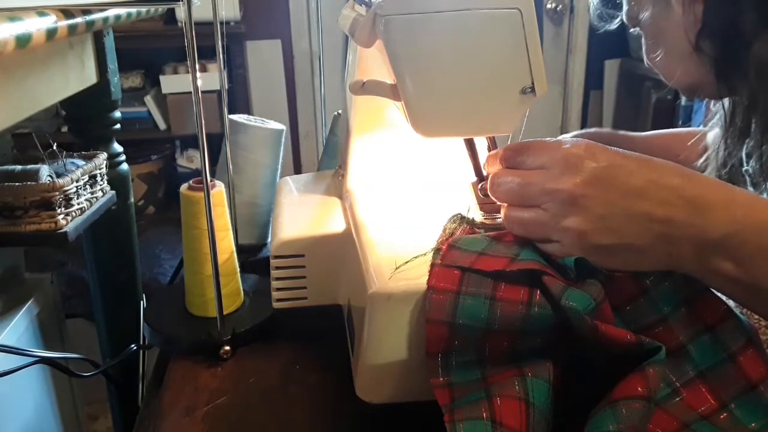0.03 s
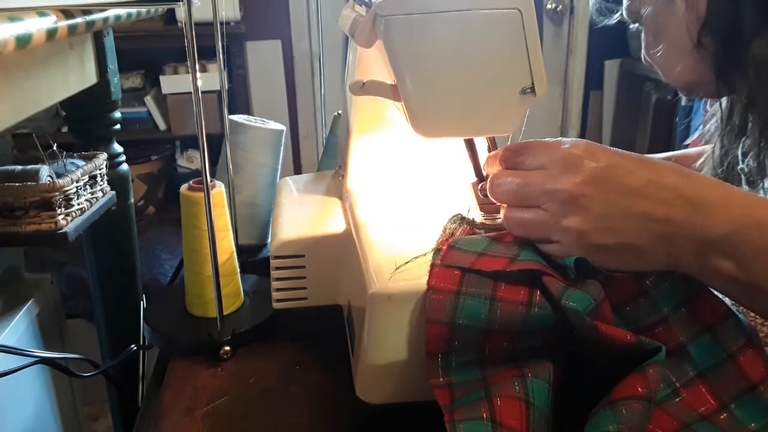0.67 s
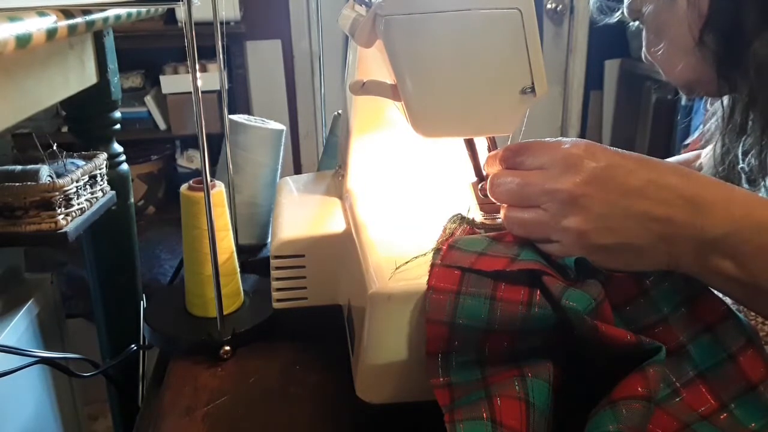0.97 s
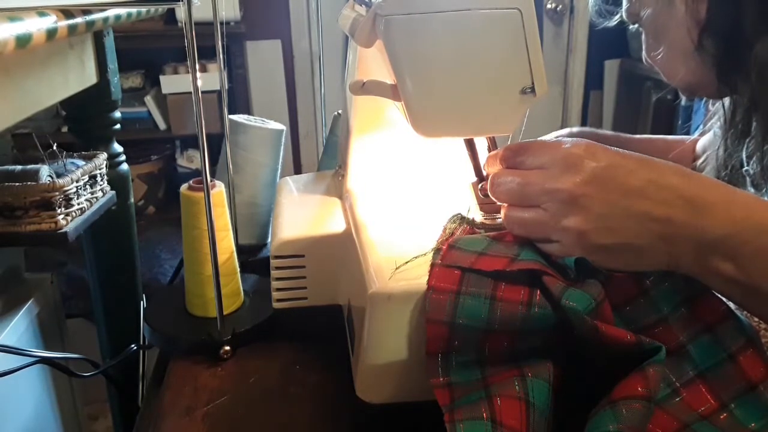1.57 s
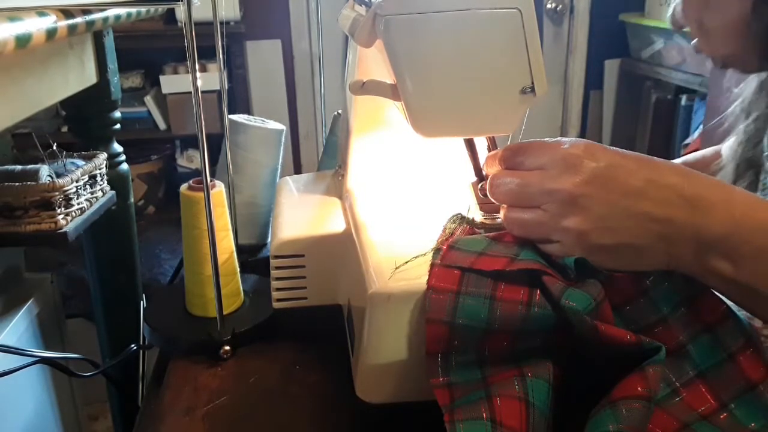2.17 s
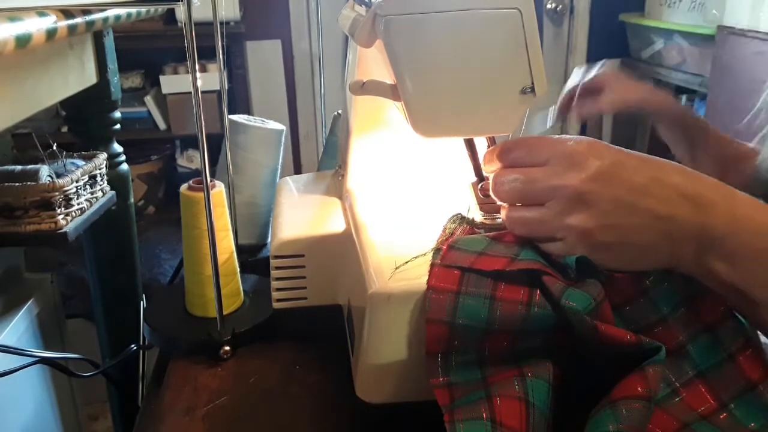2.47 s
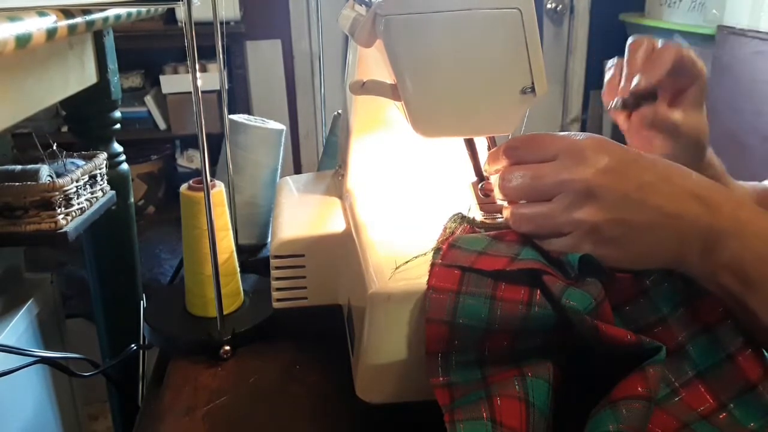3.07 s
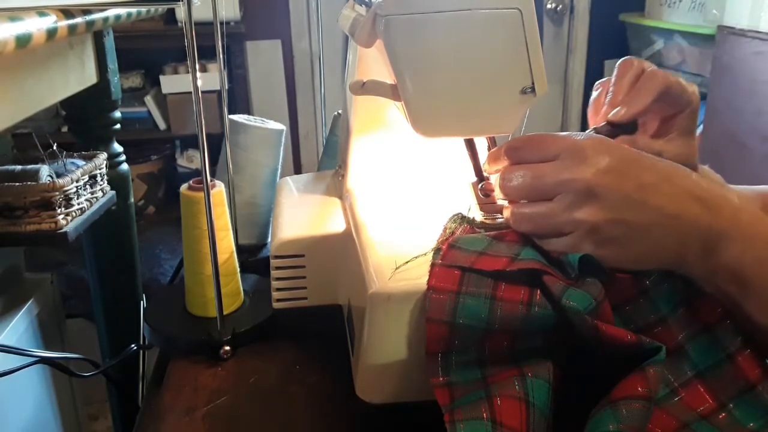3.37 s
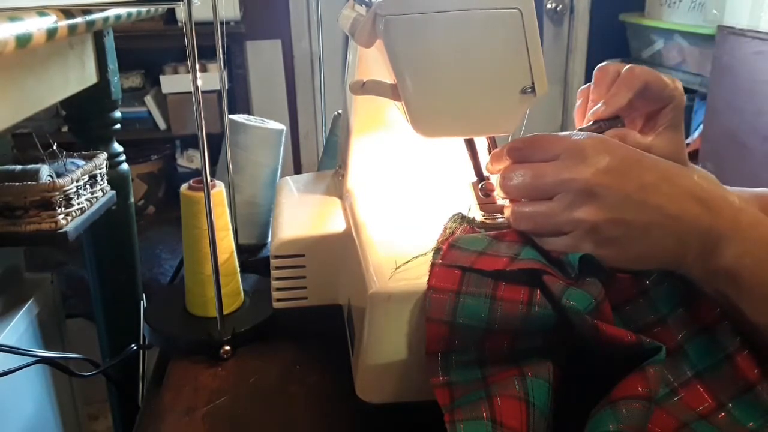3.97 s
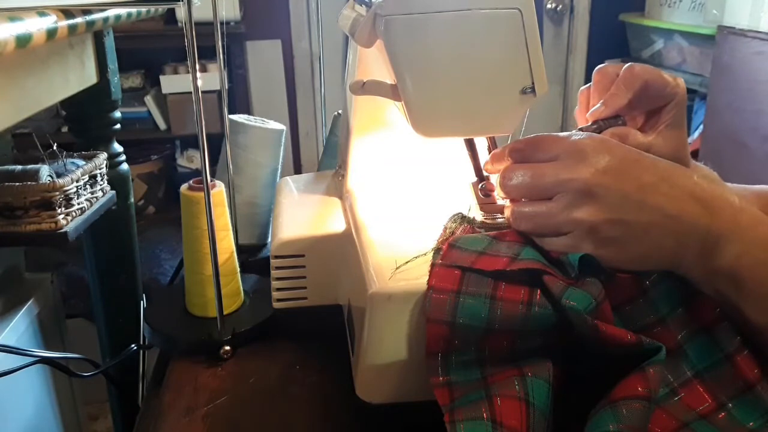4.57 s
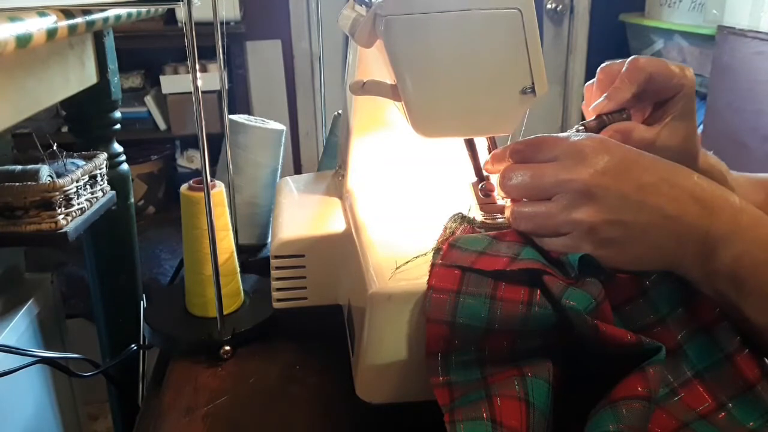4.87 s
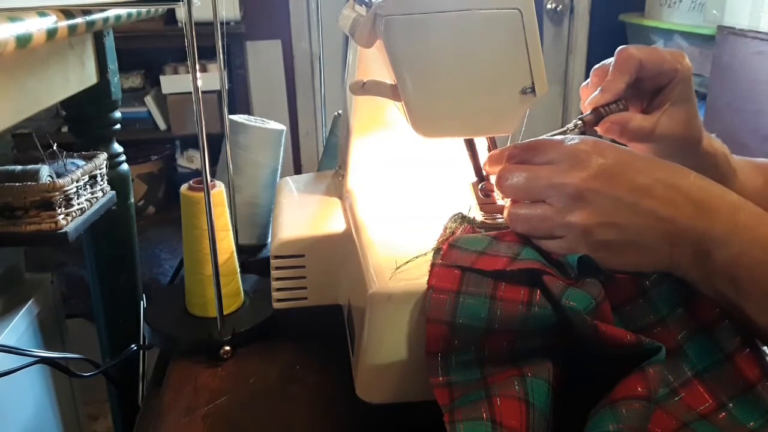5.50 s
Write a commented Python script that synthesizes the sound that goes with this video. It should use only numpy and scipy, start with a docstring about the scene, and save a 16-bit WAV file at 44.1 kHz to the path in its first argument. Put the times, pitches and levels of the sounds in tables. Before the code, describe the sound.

In a small quiet room, close by, metal tools knock hollowly against an idle sewing machine and slide and clink together. A lever clacks, one sharp knock stands out, and the tools clatter again. The second half is much quieter, with sparse ticks of thread snips and one clearer tap near the end. Faint mains hum, rumble and hiss lie underneath.

```python
"""Hollow knocks come first, as someone rummages among small tools on the bed of a stopped sewing machine.
Pieces clink and slide together, a lever clacks, and thread snips are picked up and tick against the
needle clamp. Each impact is a short crack and a damped ring; sliding is a train of tiny impacts.
The small room rings briefly after every contact; mains hum, a low rumble and a thin hiss lie underneath."""
import sys
import numpy as np
from scipy import signal
from scipy.fft import rfft, irfft, next_fast_len
from scipy.io import wavfile
from scipy.ndimage import uniform_filter1d

SR = 44100
rng = np.random.default_rng(int(sys.argv[2]) if len(sys.argv) > 2 else 0)


def persist_wave(psi):
    """Save psi, clipped to +-1, as 16-bit WAV."""
    counts = np.round(np.clip(psi, -1, 1) * 32767).astype(np.int16)
    wavfile.write(sys.argv[1], SR, np.atleast_2d(counts).T)


N = 248635
RING_TIME = np.arange(3 * SR // 5) / SR
PLAIN_BLOW_DB = -35  # reference strength of a contact


# Each row: start in seconds, strength in dB, edge in dB (a steel point adds treble, padding loses it).
BED_KNOCKS = [(0.404, -49, 3), (0.468, -49.5, 8.5), (0.502, -35, -16), (0.547, -27, -13), (0.559, -29, 1.5),
              (0.706, -59, -25), (1.755, -35.5, -7), (1.776, -45, -4.5), (1.836, -25, 8),
              (2.008, -42.5, -15), (2.086, -41, -11.5), (2.150, -41, -8)]
# Tones heard after a knock. Each row: frequency in Hz, relative level in dB, 60 dB decay (t60) in seconds.
BED_KNOCK_TONES = [(276.5,-1.5,0.171), (383,-5,0.11), (473,-4.5,0.27), (830.7,3,0.24), (1210,-12,0.2),
                   (1653,-10,0.27), (1950,-28.5,0.4), (2810,-16,0.29), (3650,-9.5,0.23), (3920,-20.5,0.11),
                   (4800,-19.5,.19), (5044,-16,0.33), (5900,-24.5,0.37), (6630,-24.5,.2), (7340,-15.5,.27),
                   (7700,-10,0.28), (8500,-14.5,0.26)]
# The dense clatter between the tones. Each row: frequency in Hz, gain in dB.
BED_CLATTER = [(120,-14), (220,-12.5), (290,2), (480,0.5), (620,-7), (850,-1.5), (1120,-13), (1600,-10.5),
               (2300,-15.5), (3600,-14.5), (5600,-23), (7900,-8.5), (10500,-28), (15500,-41.5)]
# A plain blow's thud, knock, clack and tick in relative dB, then thud growth in dB per dB of strength.
BED_BALANCE = [-1.5, -0.5, -8.5, -15, 0.47]

def bed_knocks():
    """Resonance: knocks on the hollow bed ring low, and are heard with a bright colouring near 8 kHz."""
    return strikes(BED_KNOCKS, BED_KNOCK_TONES, BED_CLATTER, BED_BALANCE, room_db=3.0, tail_per_edge=0.55,
                   ring_db=-17.0, ring_growth=0.15, crack_db=2.5, crack_t60=0.044)


# Each row: start in seconds, strength in dB, edge in dB.
TOOL_KNOCKS = [(0.973, -44, -11.5), (0.994, -48, 10), (1.030, -39, 8), (1.075, -38, -2), (1.167, -68, 22),
               (1.174, -55.5, 21.5), (1.243, -55, 6.5), (2.008, -39, 8), (2.045, -35.5, 9.5),
               (2.052, -37, 6.5), (2.086, -30.5, -14.5), (2.121, -31, -5), (2.150, -34, -11),
               (2.308, -47, 9.5), (2.374, -28.5, -10), (2.415, -45, 7), (2.421, -40.5, 15.5)]
# Tones heard after a knock. Each row: frequency in Hz, relative level in dB, t60 in seconds.
TOOL_KNOCK_TONES = [(375,-8.5,0.073), (548,-9,0.18), (697,3.5,0.13), (759,-8,0.21), (797,-2,0.057),
                    (900,2,0.085), (1032,-7,.2), (1503,-7,0.28), (1770,-17.5,0.071), (2800,-14.5,0.141),
                    (3010,-11,0.22), (7660,-8,0.28), (7470,-5,.22), (8250,-8.5,.23), (8230,-4,0.24),
                    (8700,-13.5,0.067)]
# Each row: frequency in Hz, gain in dB.
TOOL_CLATTER = [(120,-16.5), (220,-14.5), (300,-6), (560,-2), (930,1), (1200,-5), (1550,-6.5), (2300,-6.5),
                (3000,-12.5), (3600,-10.5), (6000,-13.5), (8000,-2.5), (11500,-27.5), (15500,-37.5)]
# Thud, knock, clack and tick in relative dB, then thud growth in dB per dB.
TOOL_BALANCE = [-5.5, -0.5, -4, -3, 0.03]

def tool_knocks():
    """Impact: tools knock together with a short ring, heard with a bright colouring near 8 kHz."""
    return strikes(TOOL_KNOCKS, TOOL_KNOCK_TONES, TOOL_CLATTER, TOOL_BALANCE, room_db=2.0,
                   tail_per_edge=-0.3, ring_db=-16.5, ring_growth=0.11, crack_db=4.5, crack_t60=0.014)


# Each row: start in seconds, length in seconds, strength in dB, edge in dB.
TOOL_SLIDES = [(0.474, 0.071, -41.5, -1), (0.528, 0.072, -35, -3.5), (0.908, 0.16, -46, -6.5),
               (1.004, 0.14, -45, 5.5), (1.120, 0.16, -47.5, 1.5), (2.022, .1, -38, 7),
               (2.099, .11, -32.5, 0), (2.254, .11, -48, -9.5), (2.36, 0.11, -39, -10),
               (2.989, 0.13, -69, 21)]
# Thud, knock, clack and tick in relative dB, then thud growth in dB per dB.
SLIDE_BALANCE = [-2.5, 0, -2.5, 0, .5]

def tool_slides(catches_per_s, unevenness_db, peak_share, swell):
    """Stick-slip friction: edges catch and slip at random, each catch a tiny blow on the tools."""
    out, tail = np.zeros(N), room_tail()
    for start, length, strength_db, edge_db in TOOL_SLIDES:
        progress = np.linspace(0, 1, round(length * SR))
        pressure = np.interp(progress, [0, peak_share, 1], [0, 1, 0]) ** swell
        caught = rng.random(N) < catches_per_s / SR
        sizes_db = unevenness_db * np.minimum(rng.exponential(1, N), 3)
        catches = caught * from_db(sizes_db) * rng.choice([-1, 1], N)
        blow = impulse_response(TOOL_KNOCK_TONES, TOOL_CLATTER, tail, room_db=0.5, ring_db=-22.0,
                                crack_db=10.5, crack_t60=0.011)
        scrape = signal.fftconvolve(pressure * catches[:len(pressure)], blow)
        add(out, start, weigh(scrape, SLIDE_BALANCE, strength_db, edge_db))
    return out


# Each row: start in seconds, pitch in Hz, bandwidth in Hz, level in dB.
STEEL_CLINKS = [(1.075, 1560, 450, -37.5), (1.190, 830, 89, -41.5), (2.05, 3010, 260, -32.5),
                (2.139, 1536, 140, -36), (2.373, 2860, 421, -38), (3.018, 2700, 1400, -56),
                (3.073, 2800, 1400, -58), (3.86, 2800, 1000, -68.5)]

def steel_clinks(room_db, crack_t60):
    """Damping broadens a resonance: a piece lying on others rings in one band, carried on by the room."""
    out = np.zeros(N)
    for start, hz, width_hz, level_db in STEEL_CLINKS:
        blow = noise_burst(crack_t60) + from_db(room_db) * room_tail()
        clink = band(blow, hz - width_hz / 2, hz + width_hz / 2)
        add(out, start, from_db(level_db) * clink / np.sqrt(loudest_power(clink)))
    return out


# Each row: frequency in Hz, relative level in dB, t60 in seconds.
LEVER_TONES = [(319,-2,0.11), (408,-4,.25), (2035,-10.5,0.28), (2490,-17,0.11), (2740,-20,0.18),
               (3042,-16,0.41), (3520,5,0.025), (4600,-13,0.18), (5170,-17,0.14)]
# Each row: frequency in Hz, gain in dB.
LEVER_CLATTER = [(110, -63), (180, -20.5), (311, -2), (353, -19), (409, 4.5), (668, 2.5), (719, -9.5),
                 (1200, -8.5), (1540, -19.5), (2480, -5), (4130, -21.5), (7540, -18), (14000, -72)]
# Thud, knock, clack and tick in relative dB, then thud growth in dB per dB.
LEVER_BALANCE = [1, -4.5, 2, -10, 1]

def lever_clack(start_s, hits, first_gap_s, gap_ratio, strength_db, loss_db, edge_db):
    """Inelastic rebound: a lever snaps over and bounces, each time sooner and softer."""
    bounces = []
    for k in range(hits):
        delay = first_gap_s * np.sum(gap_ratio ** np.arange(k))
        bounces.append((start_s + delay, strength_db - loss_db * k, edge_db))
    return strikes(bounces, LEVER_TONES, LEVER_CLATTER, LEVER_BALANCE, room_db=-4.5, tail_per_edge=0,
                   ring_db=-19.0, ring_growth=0, crack_db=8.0, crack_t60=0.008)


# Each row: start in seconds, strength in dB, edge in dB.
SNIP_TICKS = [(3.018, -64.5, 19.5), (3.073, -66, 19), (3.859, -67.5, 3), (4.154, -86, 42),
              (4.261, -65, 4.5), (4.512, -51.5, -13.5), (4.677, -39.5, 0)]
# Each row: frequency in Hz, relative level in dB, t60 in seconds.
SNIP_TICK_TONES = [(834,-5.5,0.096), (880,-10,0.39), (1010,-5,0.19), (1115,-2,0.084), (2060,-10,0.16),
                   (3220,-11.5,0.083), (3450,-39,0.14), (7160,-28,0.08)]
# Each row: frequency in Hz, gain in dB.
SNIP_CLATTER = [(120,-26), (280,-7), (630,-24), (930,-7.5), (1550,-15), (2000,-11), (2450,-15), (3300,-20),
                (3900,-24), (4600,-40.5), (6200,-40), (8350,-21.5), (11000,-51.5), (15500,-47)]
# Thud, knock, clack and tick in relative dB, then thud growth in dB per dB.
SNIP_BALANCE = [-9.5, 1, -6.5, -7, 0.96]

def snip_ticks():
    """Light impacts: the snips tick faintly as they turn in the hand, then touch the needle clamp."""
    return strikes(SNIP_TICKS, SNIP_TICK_TONES, SNIP_CLATTER, SNIP_BALANCE, room_db=-1.5,
                   tail_per_edge=-0.25, ring_db=-21.0, ring_growth=-0.2, crack_db=7.5, crack_t60=0.032)


def strikes(rows, tones, spectrum, balance, room_db, tail_per_edge, ring_db, ring_growth,
            crack_db, crack_t60):
    """Superposition: blows on one thing add up and share its reflections. Both slopes are in dB per dB."""
    out, tail = np.zeros(N), room_tail()
    for start, strength_db, edge_db in rows:
        tail_db = room_db + tail_per_edge * edge_db  # padding damps the bed; a point on steel stays dry
        ringing_db = ring_db + ring_growth * (strength_db - PLAIN_BLOW_DB)
        blow = impulse_response(tones, spectrum, tail, tail_db, ringing_db, crack_db, crack_t60)
        add(out, start, weigh(blow, balance, strength_db, edge_db))
    return out


def impulse_response(tones, spectrum, tail, room_db, ring_db, crack_db, crack_t60):
    """Free decay: damped sinusoids of uneven strength join a short crack and the room's tail."""
    crack = from_db(crack_db) * noise_burst(crack_t60)
    clatter = colour(crack + from_db(room_db) * tail, spectrum)
    strengths = rng.uniform(0.7, 1.3, len(tones)) * rng.choice([-1, 1], len(tones))
    ring = sum(strength * from_db(db) * np.sin(2 * np.pi * hz * RING_TIME) * decay(t60)
               for (hz, db, t60), strength in zip(tones, strengths))
    return clatter + from_db(ring_db + room_db) * ring


# The five limits in Hz of four registers: thud, knock, clack and tick.
REGISTER_LIMITS = [200, 550, 1300, 4500, 12000]
# The gain of each register in dB per dB of edge.
EDGE_SHARE = [-0.26, 0.1, 0.31, 0.98]

def weigh(sound, balance, strength_db, edge_db):
    """Contact time shapes the spectrum: a blow's strength and edge set the level of each register."""
    *plain_db, thud_growth = balance
    growth = np.array([thud_growth, 1, 1, 1])  # harder blows are shorter, so the thud may grow less
    force_db = growth * (strength_db - PLAIN_BLOW_DB)
    levels_db = PLAIN_BLOW_DB + np.array(plain_db) + force_db + edge_db * np.array(EDGE_SHARE)
    gains = []
    for low, high, level_db in zip(REGISTER_LIMITS, REGISTER_LIMITS[1:], levels_db):
        band_db = 10 * np.log10(loudest_power(band(sound, low, high)))
        gains.append((np.sqrt(low * high), level_db - band_db))
    return colour(sound, gains)


def radiated(x, lowest_hz):
    """Radiation efficiency: things smaller than the wavelength send out almost no bass."""
    return signal.sosfilt(signal.butter(3, lowest_hz, "high", fs=SR, output="sos"), x)


# Each row: frequency in Hz, reverberation time in seconds.
ROOM_T60 = [(200, 0.39), (500, 0.21), (1200, 0.3), (3000, 0.3), (8000, 0.27), (14000, 0.29)]

def room_tail(late_db=-24, late_t60=1):
    """Reverberation: each octave dies at its own rate, over a faint, slower decay from the far corners."""
    size = len(RING_TIME)
    white = rfft(rng.standard_normal(size))
    hz = np.arange(len(white)) * SR / size
    octave = np.round(np.log2(np.clip(hz, 2 ** 8, 2 ** 14)))
    early = sum(irfft(white * (octave == k), size) * decay(at_hz(ROOM_T60, 2 ** k))
                for k in np.unique(octave))
    return early + from_db(late_db) * noise_burst(late_t60)


# Each row of these two spectra: frequency in Hz, relative spectral density in dB.
RUMBLE_SPECTRUM = [(20,-29), (40,-21), (60,-9), (80,-14.5), (96,-0.5), (118,-5.5), (150,-10), (280,-11),
                   (420,-16), (520,-16.5), (800,-21.5), (1600,-31.5), (3000,-39.5), (4000,-64)]
HISS_SPECTRUM = [(1760, -33.5), (3000, -13), (3310, -4), (4350, -10), (6170, -11), (7000, -7), (8250, 5),
                 (8800, -9.5), (10000, -13), (10750, -8.5), (11300, -10.5), (15500, -14.5)]
# Each row: frequency in Hz, RMS level in dB.
MAINS_HUM = [(120, -59.5)]

def quiet_room(rumble_db, hiss_db):
    """Stationary noise: low rumble and thin hiss sound with the pure tone of mains hum."""
    t = np.arange(N) / SR
    rumble = from_db(rumble_db) * rms_one(colour(rng.standard_normal(N), RUMBLE_SPECTRUM))
    hiss = from_db(hiss_db) * rms_one(colour(rng.standard_normal(N), HISS_SPECTRUM))
    hum = sum(np.sqrt(2) * from_db(db) * np.sin(2 * np.pi * (hz * t + rng.random()))
              for hz, db in MAINS_HUM)
    return rumble + hiss + hum


def from_db(db):
    return 10 ** (np.asarray(db) / 20)


def rms_one(x):
    return x / np.sqrt(np.mean(x ** 2) + 1e-20)


def loudest_power(x):
    """Short-time power: the mean square over the strongest 25 ms."""
    return uniform_filter1d(x ** 2, SR // 40, mode="constant").max()


def decay(t60):
    """Exponential damping: 60 dB are lost in t60 seconds."""
    return np.exp(-np.log(1000) * RING_TIME / t60)


def noise_burst(t60):
    return rng.standard_normal(len(RING_TIME)) * decay(t60)


def at_hz(points, hz):
    """Interpolation on a log-frequency axis."""
    known_hz, values = np.transpose(points)
    return np.interp(np.log(np.maximum(hz, 1)), np.log(known_hz), values)


def band(x, low, high):
    return signal.sosfilt(signal.butter(2, [low, high], "band", fs=SR, output="sos"), x)


def colour(x, spectrum):
    """Minimum-phase filtering: folding the cepstrum makes the given spectrum causal."""
    size = 2 * next_fast_len(len(x) // 2 + SR // 20)
    hz = np.arange(size // 2 + 1) * SR / size
    cepstrum = irfft(np.log(from_db(at_hz(spectrum, hz))))
    cepstrum[1:size // 2] *= 2
    cepstrum[size // 2 + 1:] = 0
    return irfft(rfft(x, size) * np.exp(rfft(cepstrum)))[:len(x)]


def add(track, start_s, sound):
    start = round(start_s * SR)
    track[start:start + len(sound)] += sound[:N - start]


def scene():
    """Superposition: bed, tools, lever and snips sound over the quiet room."""
    knocks = bed_knocks() + tool_knocks()
    clinks = steel_clinks(room_db=-3.0, crack_t60=0.05)
    lever = lever_clack(start_s=1.357, hits=3, first_gap_s=0.027, gap_ratio=0.52,
                        strength_db=-42.5, loss_db=2, edge_db=-1.5)
    snips = snip_ticks()
    slides = tool_slides(catches_per_s=500, unevenness_db=5.0, peak_share=0.38, swell=1.1)
    contacts = radiated(knocks + clinks + lever + snips + slides, lowest_hz=134)
    return (contacts + quiet_room(rumble_db=-55.5, hiss_db=-76.5))[None]


def record(dry):
    """Band limiting: a steep low-pass cuts the treble above 15.5 kHz."""
    return signal.sosfilt(signal.ellip(10, 0.2, 70, 15500, fs=SR, output="sos"), dry)


dry = scene()
out = record(dry)
persist_wave(out)
```